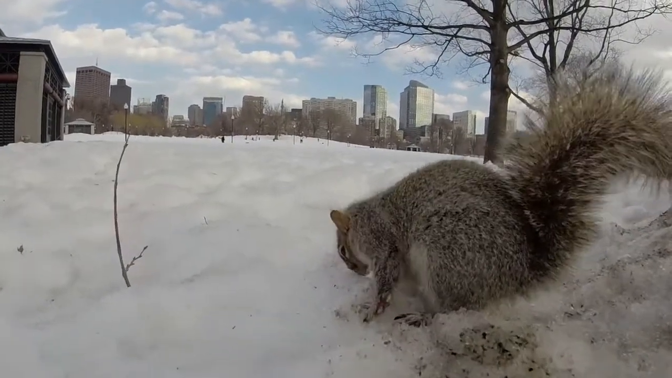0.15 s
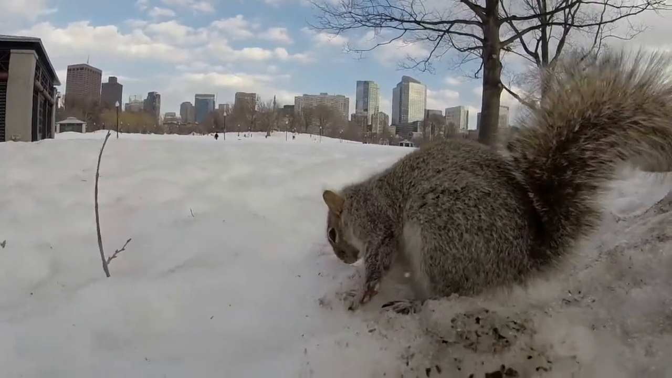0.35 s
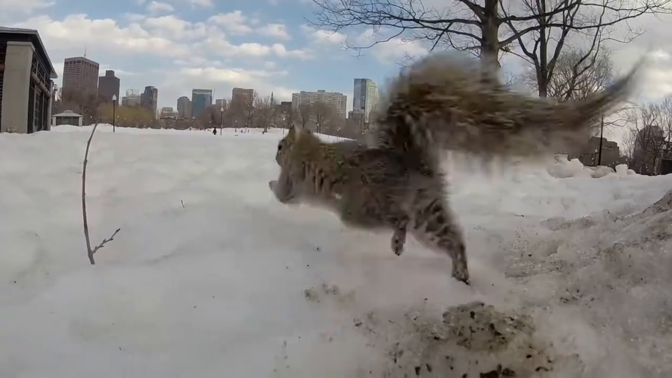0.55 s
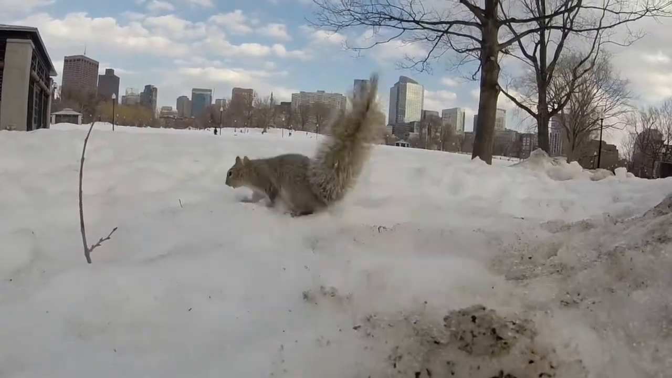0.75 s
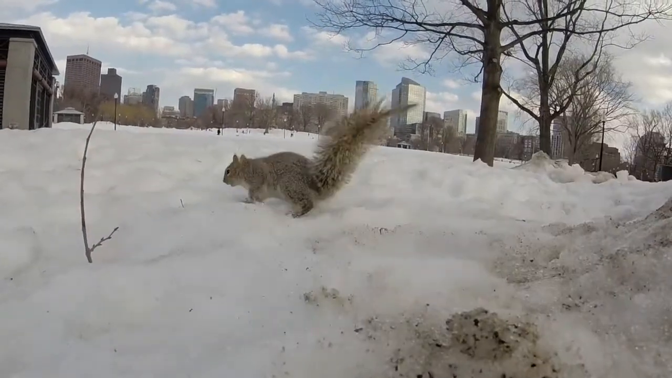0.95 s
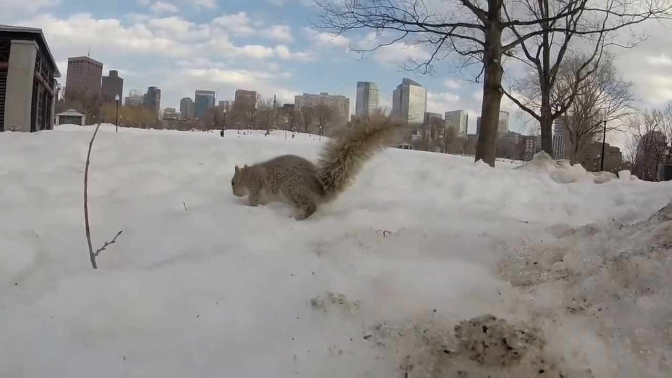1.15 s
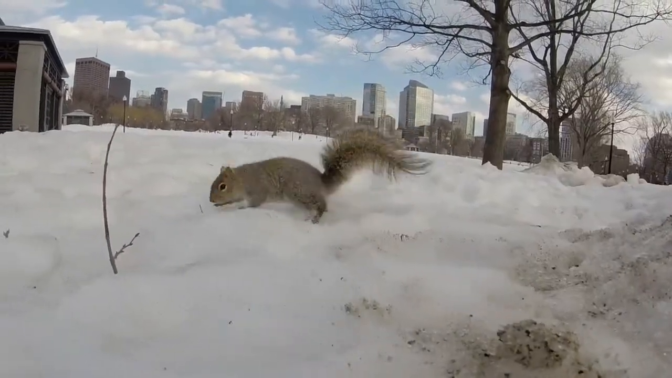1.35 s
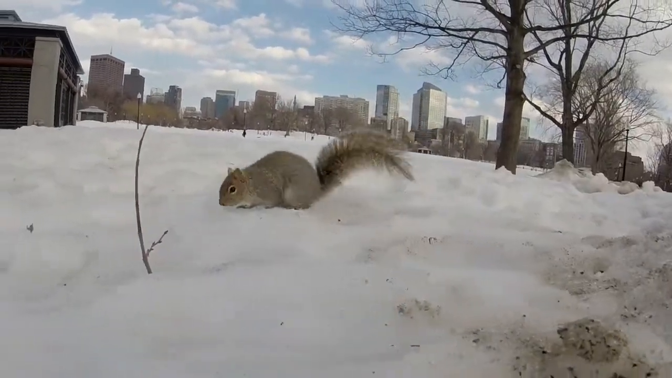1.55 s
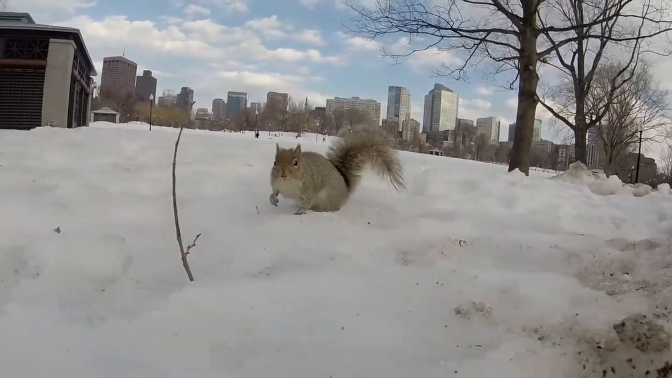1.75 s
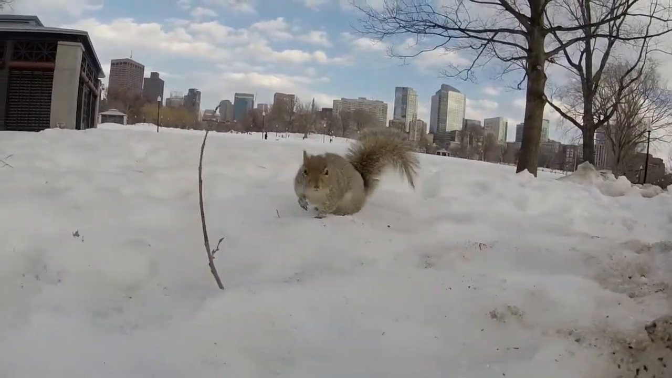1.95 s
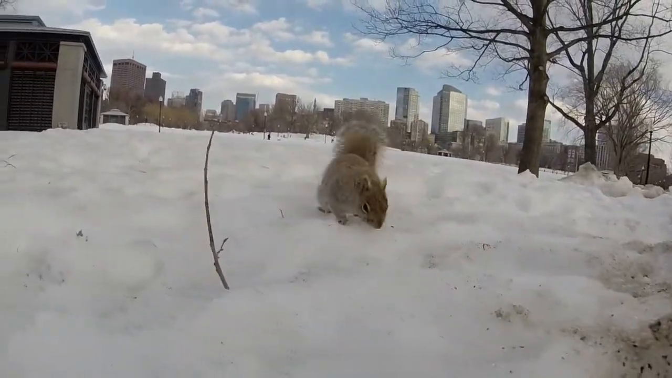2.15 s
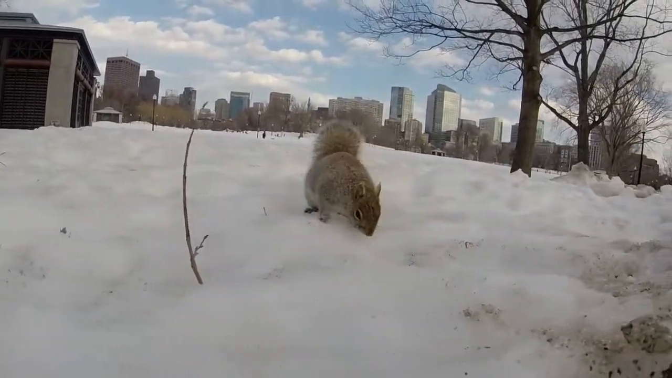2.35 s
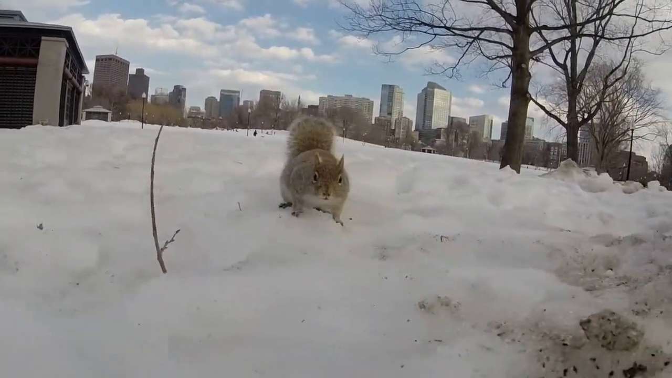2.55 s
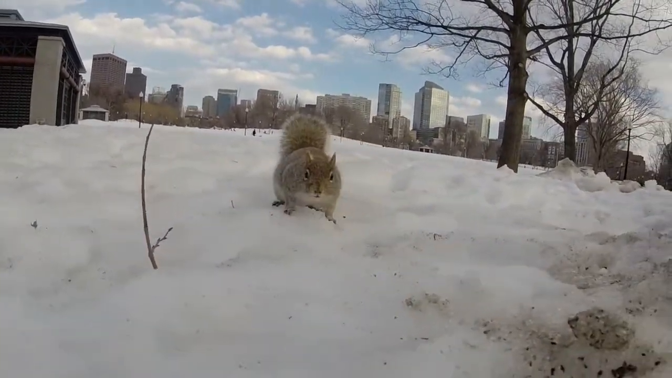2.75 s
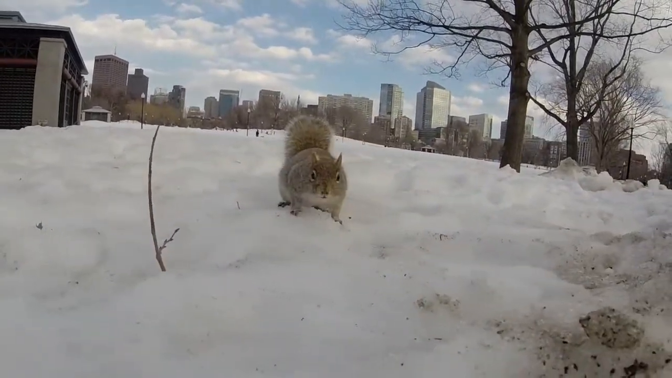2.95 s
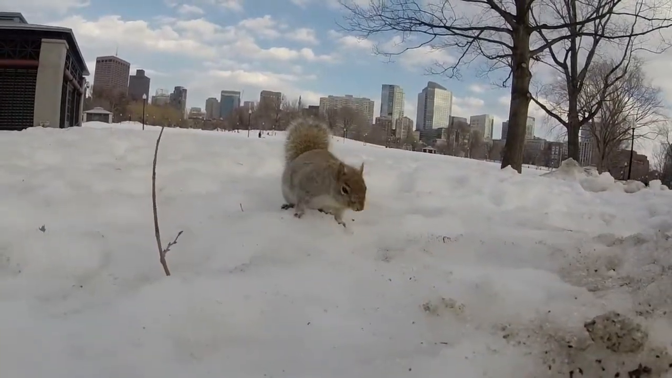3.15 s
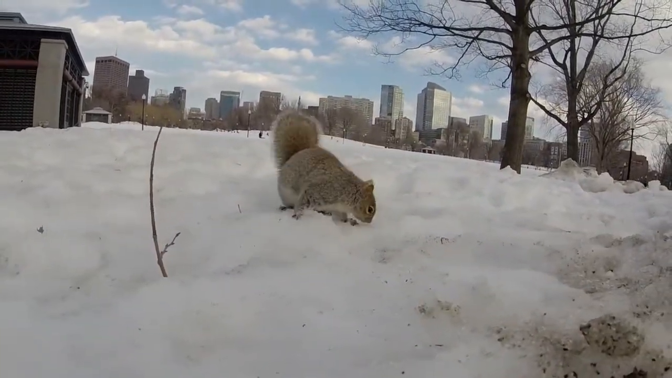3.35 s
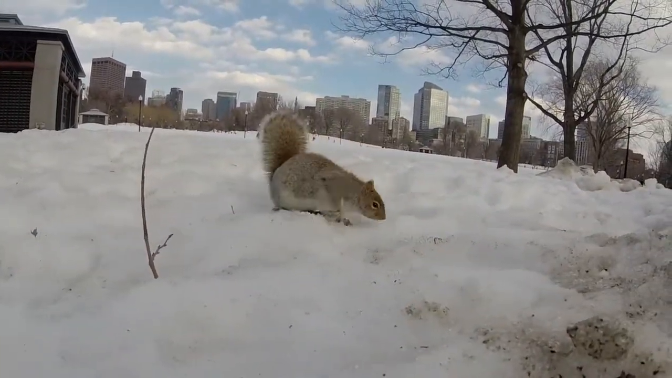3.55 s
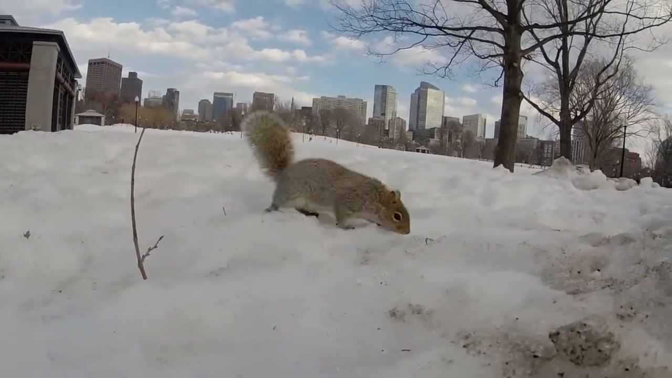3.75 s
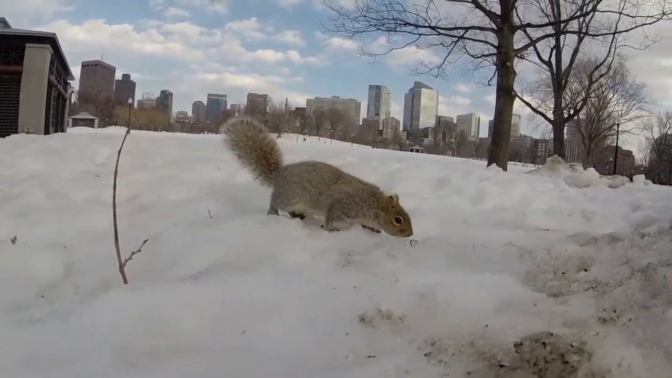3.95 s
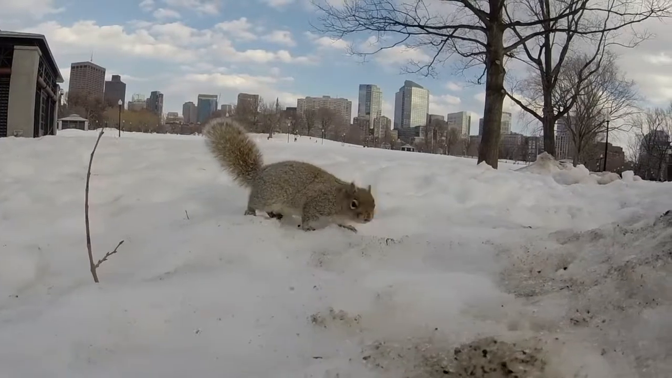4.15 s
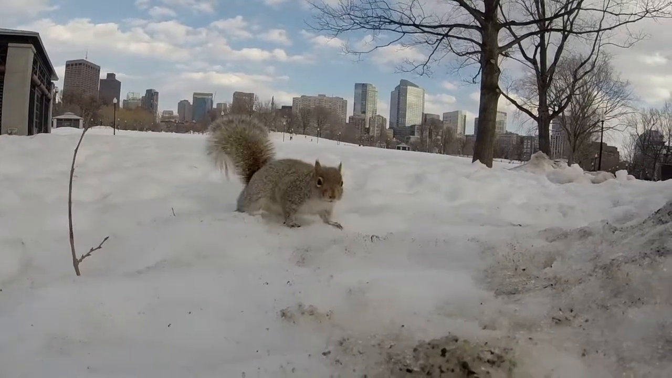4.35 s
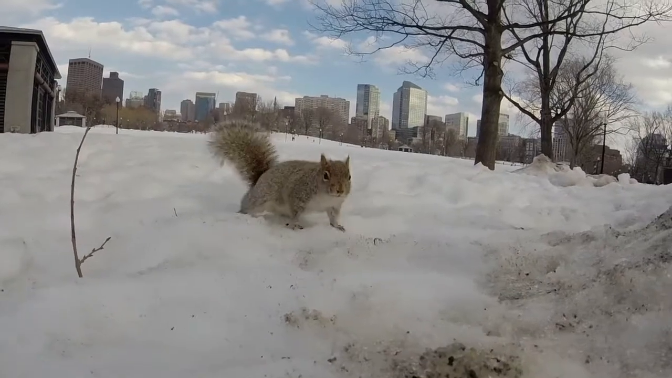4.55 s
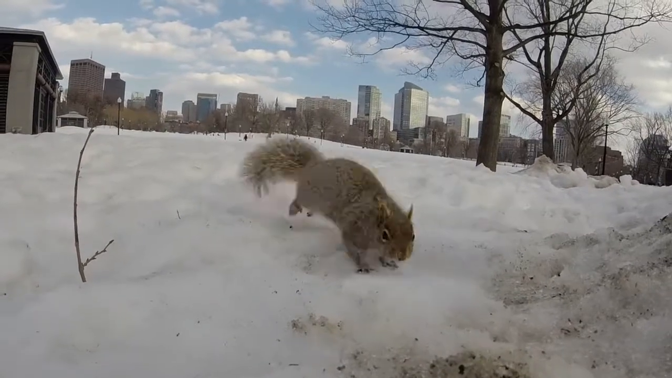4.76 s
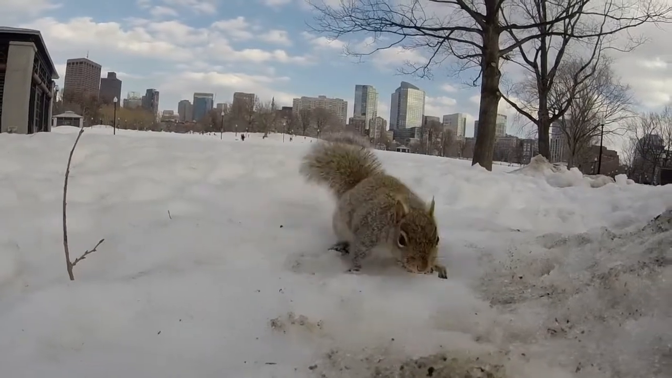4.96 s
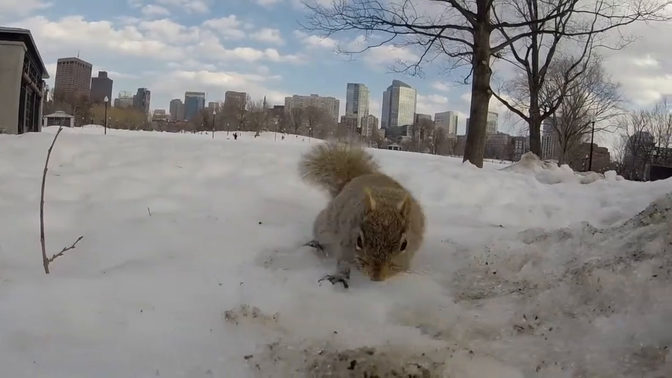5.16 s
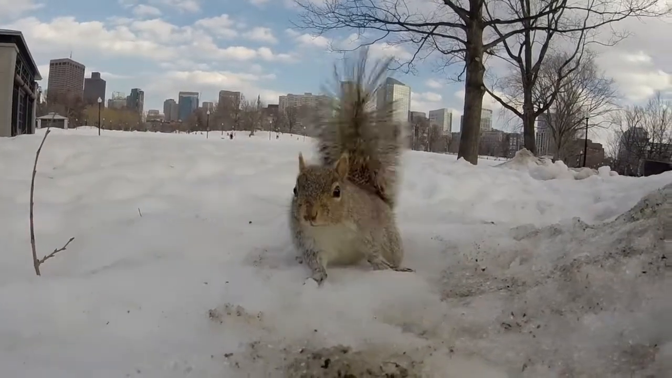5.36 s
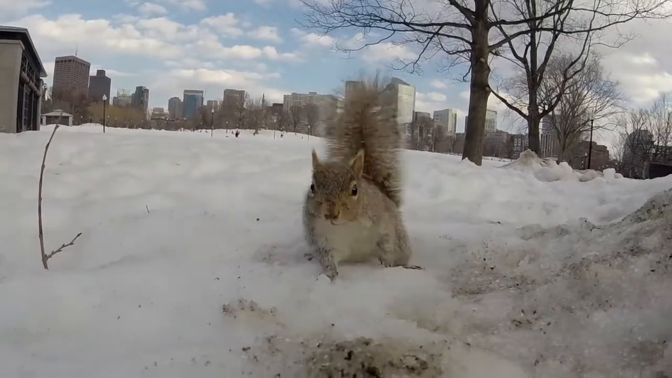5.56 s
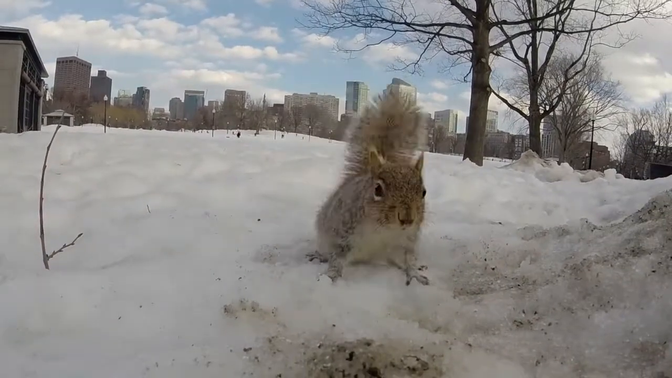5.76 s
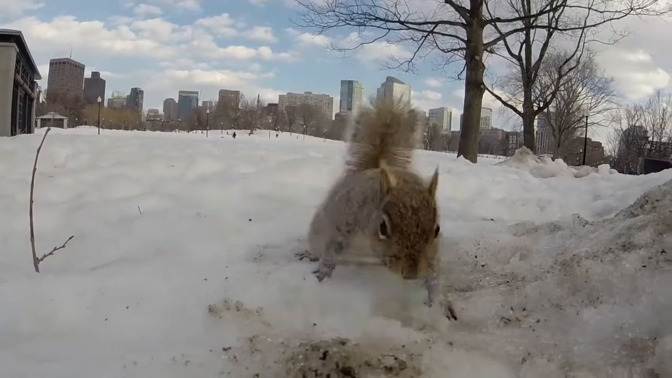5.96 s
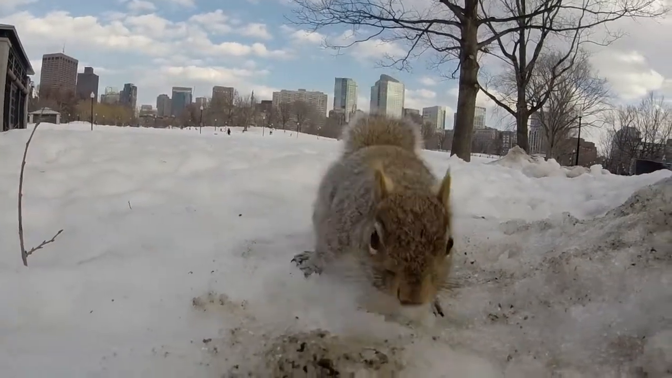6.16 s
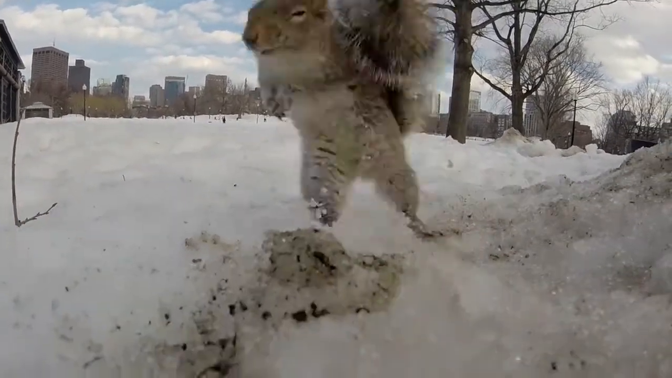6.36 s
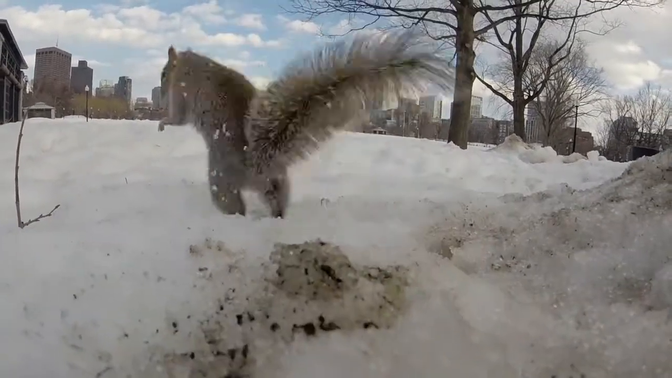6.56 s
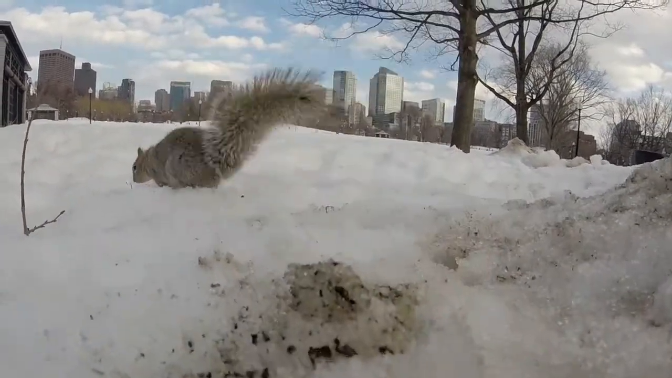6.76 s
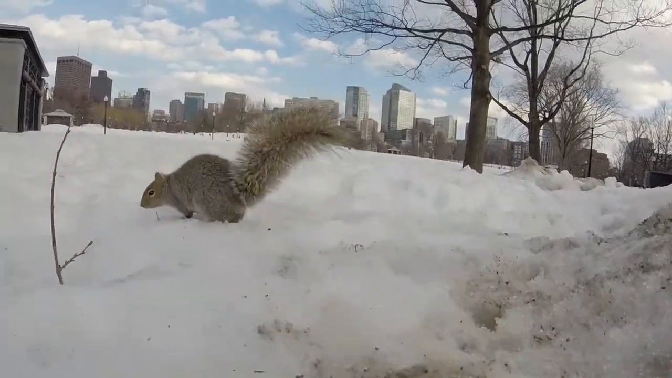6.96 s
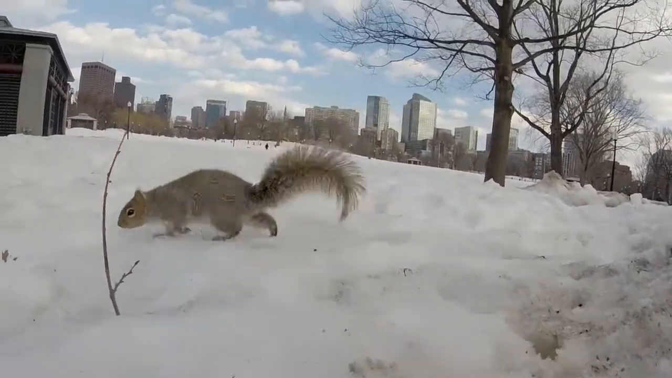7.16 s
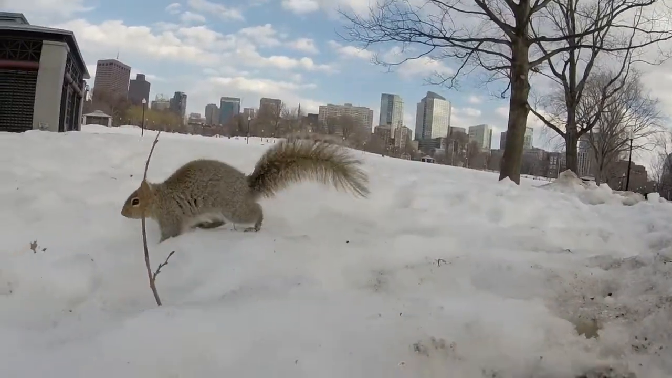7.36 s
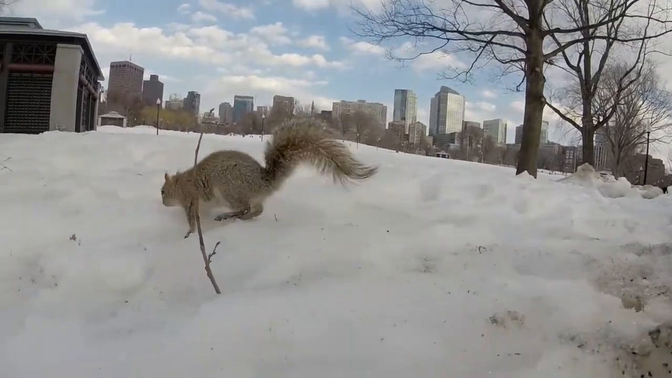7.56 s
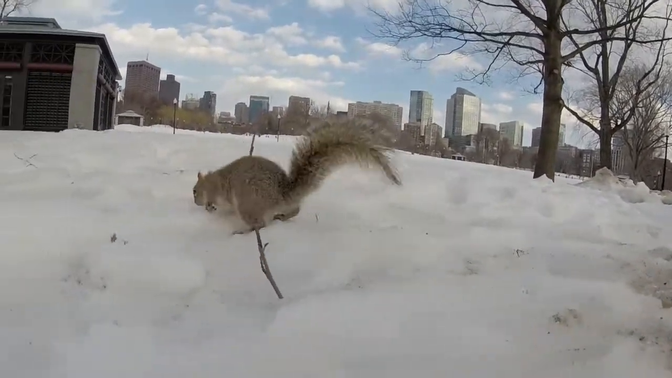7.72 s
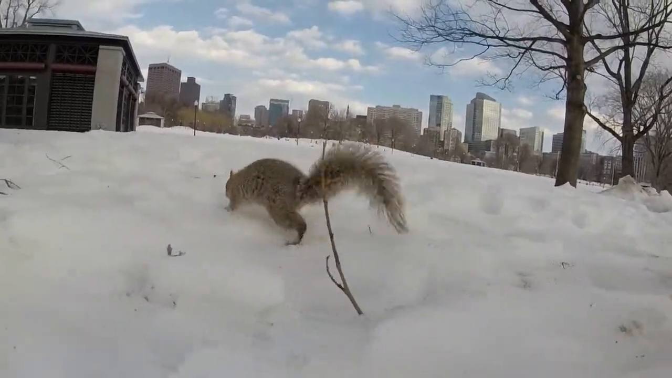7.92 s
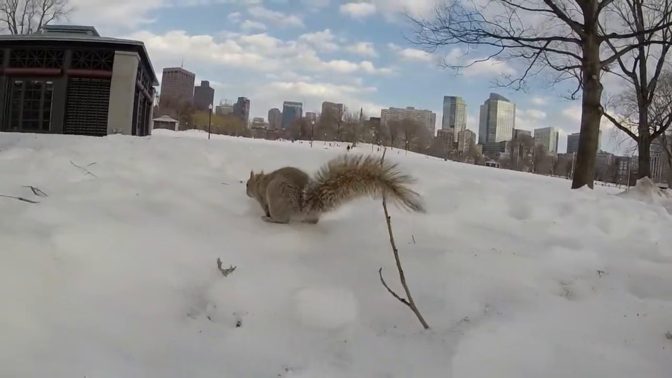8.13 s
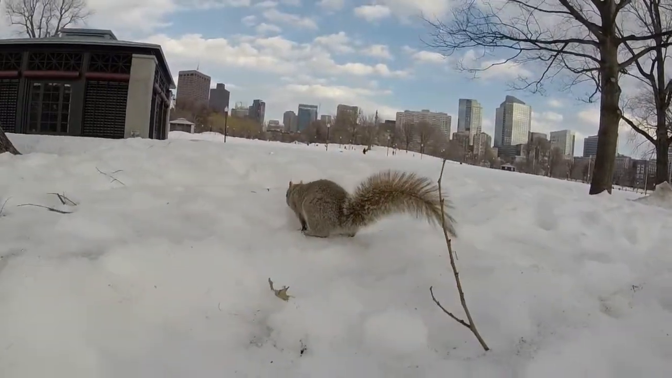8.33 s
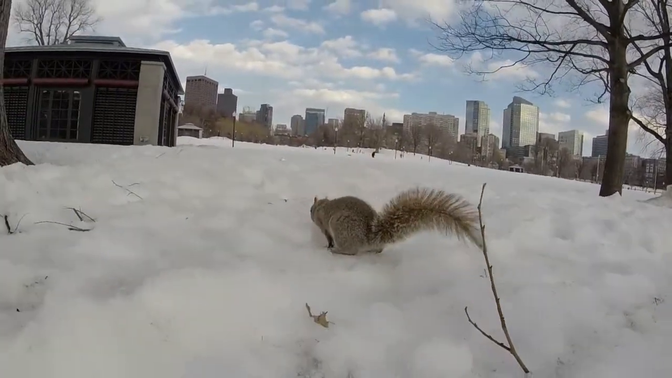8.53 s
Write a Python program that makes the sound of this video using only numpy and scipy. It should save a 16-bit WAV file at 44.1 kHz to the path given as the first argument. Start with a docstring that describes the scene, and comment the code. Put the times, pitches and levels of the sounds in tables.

```python
"""A small camera rests on crusty snow in a city park, following a squirrel; far traffic rumbles and hisses.
In the first two seconds it slides twice: ice grains break under the plastic housing and set it ringing,
and single crust snaps stand out. Short nudges follow, while a far engine swells and fades near 3 s.
From 5 s the camera is pressed into the snow and rings differently. The loudest scrape comes near 6.4 s;
the recorder then turns its gain down and lets it creep back."""
import sys
import numpy as np
from scipy import signal
from scipy.fft import rfft, irfft, next_fast_len
from scipy.io import wavfile
from scipy.ndimage import uniform_filter1d, map_coordinates

SR = 44100
rng = np.random.default_rng(int(sys.argv[2]) if len(sys.argv) > 2 else 0)


def wrap_up_sound(samples):
    """Save the sound to the file named by the first command line argument, as 16-bit audio."""
    columns = np.atleast_2d(samples).T
    # keep every value between -1 and 1, then stretch to whole-number steps
    tamed = np.clip(columns, -1, 1)
    steps = np.round(tamed * 32767).astype(np.int16)
    wavfile.write(sys.argv[1], SR, steps)


N = 378819

# Slides over the crust; knock and fizz are relative to the shell level:
# (start [s], peak [s], end [s], shell level at peak [dB], swell [dB], fade [dB], knock [dB], fizz [dB])
SCRAPES = [(0.281, 0.485, .73, -22, 24, 11.5, -0.4, -10), (0.727, .92, .94, -41.5, 1.5, 4.5, -1.5, -10.5),
           (1.048, 1.393, 1.7, -28.5, 30, 13.5, -1, -11), (2.606, 2.615, 2.655, -30, 4, 6.5, -2.5, -12.5),
           (2.662, 2.699, 2.765, -28, 10.5, 11.5, -1, -10.5), (4.064, 4.105, 4.135, -39.5, 26, 8, 3, -10),
           (5.166, 5.257, 5.265, -28, 11, 1.5, 2, -16), (5.267, 5.292, 5.33, -17, 15, 13, 8.5, -17),
           (5.335, 5.327, 5.36, -36.5, -5, 4.5, 12, -13.5), (5.535, 5.565, 5.6, -39, 4.5, 9.5, 8, -18),
           (5.616, 5.65, 5.66, -55, -3, 5, 4, -14), (5.96, 6.107, 6.12, -44, 14, 5, 5.5, -16),
           (6.13, 6.197, 6.23, -52.5, 6, 0, 9, -18), (6.214, 6.342, 6.4, -16.5, 45.5, 2.5, 3, -15.5),
           (6.386, 6.424, 6.437, -10, 12, -2, -2, -7.5), (6.453, 6.455, 6.56, -32.5, -6, 29, 4, -10.5),
           (6.554, 6.642, 6.84, -50.5, 6, 0, 3.5, -7.5), (6.837, 6.89, 6.94, -53.5, 1, -1, 8.5, -15.5)]
# Single breaks in the crust: (time [s], strength [dB], extra strength of the knock [dB])
CRUST_SNAPS = [(0.2753, -34.5, -10), (0.3212, -20, -22), (0.3905, -11, -10), (0.4374, -8.5, -18),
               (0.4978, 3.5, -6), (0.5302, -6, -11), (0.5536, -5, -6.5), (0.6, -7.5, -3.5),
               (0.6454, -14, -7), (0.6993, -15, -4.5), (0.8081, -31, -2), (0.8175, -21, -7.5),
               (0.8355, -21.5, 1.5), (1.05, -29.5, -1), (1.1144, -30, -13), (1.1917, -24, 4.5),
               (1.3224, -16, 1), (1.3483, -10, -7), (1.3957, -12, -1), (1.4152, -12, -25),
               (1.4411, -7.5, -11.5), (1.4574, -10.5, -0.5), (1.4785, -11, -8), (1.5948, -21.5, 5),
               (1.6616, -23.5, -28), (1.7155, -32, -16), (2.6174, -16.5, -10), (2.6718, -20, -5),
               (2.6958, -15.5, -19), (2.7544, -28, 11), (2.9966, -37, -4), (3.022, -33.5, -8),
               (4.0731, -25, -7), (4.0926, -20, -3.5), (4.4458, -24.5, -5.5), (5.2011, -15.5, 5),
               (5.229, -11.5, -3.5), (5.2645, -21.5, 14.5), (5.2814, -3.5, -16.5), (5.3044, -3.5, -7),
               (5.5383, -36, 10), (5.7683, -32.5, -3), (5.7962, -34.5, 4), (5.8601, -30.5, -8),
               (6.0122, -29, -4.5), (6.1789, -34.5, 10), (6.2322, -23, 6), (6.2951, -18, 4),
               (6.347, -1, 0.5), (6.571, -20.5, -6), (6.5844, -18.5, -26), (6.7291, -28, -8),
               (6.8808, -31, 11), (6.8992, -19.5, 3.5)]
# The tones at which each part rings: (pitch [Hz], width [Hz], relative level [dB])
SHELL_TONES = [(1810, 150, -9), (2215, 320, 3), (2661, 33, 6.5), (2873, 177, 3.5), (4200, 670, 0),
               (4140, 190, 4)]  # the plastic shell
PRESSED_TONES = [(2167, 260, 2), (2542, 233, 0), (3320, 430, -2.5), (4320, 160, -3)]  # the shell held down into the snow
KNOCK_TONES = [(637, 91, -2), (840, 119, 0), (1181, 110, -8), (1488, 213, -10)]  # the camera's body
THUD_TONES = [(363, 130, 0)]  # the whole camera on the snow
MOUNT_TONES = [(1860, 6.5, 1), (2740, 14, 2)]  # long-ringing parts of the mount
FIZZ_TONES = [(4960, 690, 10), (5940, 1200, 1.5)]  # the fizz of breaking ice
SPARKLE_TONES = [(7760, 630, -0.5), (9400, 810, -1.5), (11900, 14000, -12)]  # its highest treble
# Far traffic, from rumble to hiss: (frequency [Hz], relative level [dB])
TRAFFIC_SPECTRUM = [(15, -24.5), (25, 4), (106, -6.5), (200, -10), (363, -14), (600, -17), (800, -14.5),
                    (1000, -12), (1240, -21), (1460, -28), (2000, -28), (2650, -37), (3300, -32.5),
                    (5000, -37.5), (15000, -60)]
# A far engine's drone: (time [s], pitch [Hz], level [dB])
ENGINE_DRONE = [(2.2, 71.8, -49), (2.5, 77, -42), (2.9, 76.3, -42.5), (3.15, 76.2, -75)]

PRESSED_FROM_S = 5
BITE_S, LIFT_S = 0.0058, 0.022  # time for a scrape to dig in and to let go
TRAFFIC_DB, TOP_HZ = -41, 15300
FFT_SIZE = next_fast_len(N + SR // 2)  # leaves room for ringing to die away


def camera_on_snow():
    """Scrapes and snaps shake the camera, and each part rings at its own tones."""
    knock, shell, fizz, sparkle, thud = scrapes() + crust_snaps()
    pressed = np.arange(N) > PRESSED_FROM_S * SR
    return (ring(shell * ~pressed, SHELL_TONES, low_hz=1200, high_hz=5860)
            + ring(shell * pressed, PRESSED_TONES, low_hz=1280, high_hz=5700)
            + ring(knock, KNOCK_TONES, low_hz=537, high_hz=2880)
            + ring(thud, THUD_TONES, low_hz=114, high_hz=900)
            + ring(fizz, FIZZ_TONES, low_hz=3500, high_hz=9060)
            + ring(sparkle, SPARKLE_TONES, low_hz=5500, high_hz=17000)
            + amp(-6) * ring(sparkle, MOUNT_TONES, low_hz=1000, high_hz=4000))


def scrapes():
    """Sliding crushes ice grains; gives five forces that shake the camera."""
    slip = stick_and_slip(per_s=90, settle_s=.035, steady=1.1)
    coarse, medium, fine = [unit(slip * amp(0.85 * wobble(70)) * ice_grains(per_s))
                            for per_s in (900, 1600, 2500)]
    forces = knock, shell, fizz, sparkle, thud = np.zeros((5, N))
    for start, *shape, knock_db, fizz_db in SCRAPES:
        db, contact = scrape_shape(start, *shape)
        at = slice(round(start * SR), round(start * SR) + len(contact))
        shell[at] += contact * amp(db) * medium[at]
        knock[at] += contact * amp(db + knock_db) * coarse[at]
        fizz[at] += contact * amp(db + fizz_db) * fine[at]
        sparkle[at] += contact * amp(db + 1.97 * fizz_db + 7) * fine[at]  # brittle ice is far brighter
        thud[at] += contact * amp(1.08 * (db + knock_db) - 21.5) * coarse[at]  # needs a hard push
    return forces


def scrape_shape(start, peak, end, peak_db, swell_db, fade_db):
    """A scrape digs in, swells, fades and lets go: (level [dB], contact [0-1])."""
    t = np.arange(round(start * SR), round((end + LIFT_S) * SR)) / SR
    db = peak_db - np.interp(t, [start, np.clip(peak, start, end), end], [swell_db, 0, fade_db])
    contact = np.minimum((t - start) / BITE_S, (t[-1] - t) / LIFT_S)
    return db, np.clip(contact, 0, 1) ** 2


def stick_and_slip(per_s, settle_s, steady):
    """The crust gives way suddenly and settles, on top of a steady contact."""
    jolts = np.minimum(rng.exponential(size=N), 3) * (rng.random(N) < per_s / SR)
    return signal.lfilter([1], [1, -amp(-60 / (settle_s * SR))], jolts) + steady


def ice_grains(per_s, spread_db=1.5):
    """Breaking grains make scattered clicks, mixed evenly with smooth sliding noise."""
    sizes = amp(spread_db * np.minimum(rng.exponential(size=N), 2.6)) * rng.standard_normal(N)
    clicks = sizes * (rng.random(N) < per_s / SR)
    return unit(unit(clicks) + rng.standard_normal(N))


def crust_snaps():
    """Each snap is a short run of fractures; gives the same five forces as the scrapes."""
    forces = knock, shell, fizz, sparkle, _ = np.zeros((5, N))  # snaps make no thud
    t = np.arange(SR // 40) / SR
    rise = 1 - np.exp(-t / 0.00023)
    fall = amp(-60 * t / 0.0025) + 0.14 * amp(-60 * t / 0.047)  # a sharp click and a faint tail
    _, scrape_peaks, *_, scrape_fizz_db = np.transpose(SCRAPES)
    for start, db, knock_db in CRUST_SNAPS:
        fizz_db = np.interp(start, scrape_peaks, scrape_fizz_db)  # as brittle as the ice around it
        crack = rise * fall * rng.standard_normal((3, len(t)))
        crack /= np.linalg.norm(crack, axis=1, keepdims=True)
        at = slice(round(start * SR), round(start * SR) + len(t))
        knock[at] += amp(db + knock_db + 12.5) * crack[0]
        shell[at] += amp(db + 9.5) * crack[1]
        fizz[at] += amp(db + fizz_db - 4) * crack[2]
        sparkle[at] += amp(db + 1.6 * fizz_db + 9) * crack[2]
    return forces


def ring(force, tones, low_hz, high_hz):
    """A shaken part rings at its tones and gives off little below low_hz or above high_hz."""
    f = np.fft.rfftfreq(FFT_SIZE, 1 / SR)
    response = sum((-1) ** k * amp(db) * 1j * f * width / (hz ** 2 - f ** 2 + 1j * f * width)
                   for k, (hz, width, db) in enumerate(tones))
    bass_cut = f ** 2 / (low_hz ** 2 - f ** 2 + 1.2j * f * low_hz)
    treble_cut = high_hz ** 2 / (high_hz ** 2 - f ** 2 + 1.4j * f * high_hz)
    return filtered(force, unit(response * (bass_cut * treble_cut) ** 2))


def far_traffic():
    """Distant cars blur into rumble and hiss, with slightly louder and softer patches."""
    spectrum = signal.stft(rng.standard_normal(N), nperseg=512)[2]
    patches = uniform_filter1d(rng.standard_normal(spectrum.shape), 8, axis=0)  # smooth over pitch
    patches = uniform_filter1d(patches, 20, axis=1)  # and over time
    noise = signal.istft(spectrum * amp(1.82 * unit(patches)), nperseg=512)[1][:N]
    f = np.fft.rfftfreq(FFT_SIZE, 1 / SR)
    hz, db = np.transpose(TRAFFIC_SPECTRUM)
    response = amp(np.interp(np.log(f + 1), np.log(hz + 1), db))
    return amp(TRAFFIC_DB + .6 * wobble(2.5)) * unit(filtered(noise, response))


def far_engine():
    """An engine drones by as one low, wavering tone."""
    times, *columns = np.transpose(ENGINE_DRONE)
    hz, db = [np.interp(np.arange(N) / SR, times, column) for column in columns]
    loudness = amp(db + 2.5 * wobble(9))
    pitch = hz + 1.5 * wobble(4.8)
    return loudness * np.sin(2 * np.pi * np.cumsum(pitch) / SR)


def amp(db):
    """Turns decibels into a multiplier."""
    return 10 ** (np.asarray(db) / 20)


def unit(x):
    """Scales x to an average power of 1."""
    return x / np.sqrt(np.mean(np.abs(x) ** 2) + 1e-20)


def wobble(per_s):
    """A smooth curve through per_s random points a second."""
    return map_coordinates(rng.standard_normal(int(N * per_s / SR) + 4), [np.arange(N) * per_s / SR])


def filtered(x, response):
    """Multiplies each frequency in x by its value in response."""
    return irfft(rfft(x, FFT_SIZE) * response, FFT_SIZE)[:N]


def scene():
    """One microphone feeds both channels."""
    mono = camera_on_snow() + far_traffic() + far_engine()
    return np.array([mono, mono])


def record(dry):
    """The recorder turns down after a loud stretch, rounds off peaks and cuts the highest treble."""
    window, lag = round(.16 * SR), round(.04 * SR)
    threshold_db, max_cut_db, recovery_db_per_s = -17, 11, 16
    power = np.abs(uniform_filter1d(dry[0] ** 2, window, origin=(window - 1) // 2, mode="constant"))
    heard_db = 10 * np.log10(np.pad(power, (lag, 0))[:N] + 1e-12)
    wanted_cut_db = np.clip(4 * (heard_db - threshold_db), 0, max_cut_db)
    recovery_db = recovery_db_per_s * np.arange(N) / SR
    cut_db = np.maximum.accumulate(wanted_cut_db + recovery_db) - recovery_db  # cuts fast, creeps back
    turned_down = dry[0] * amp(-cut_db)
    rounded = turned_down / (1 + np.abs(turned_down / .95) ** 6) ** (1 / 6)
    treble_cut = 1 / (1 + (np.fft.rfftfreq(FFT_SIZE, 1 / SR) / TOP_HZ) ** 120)
    return np.tile(filtered(rounded, treble_cut), (2, 1))


dry = scene()
out = record(dry)
wrap_up_sound(out)
```